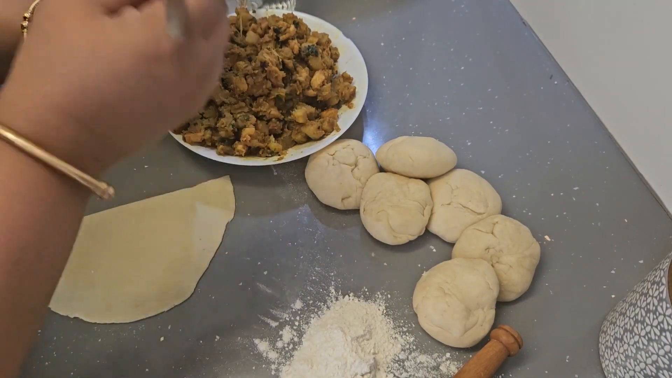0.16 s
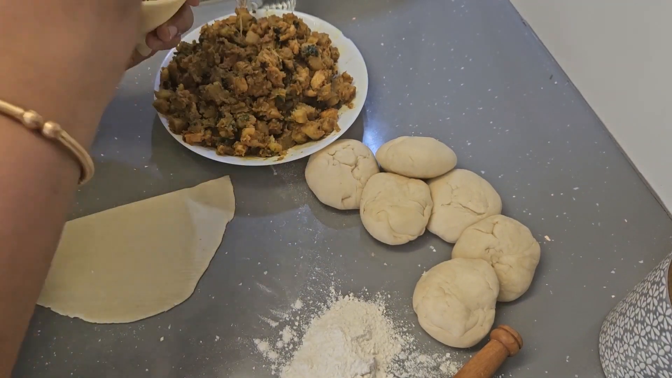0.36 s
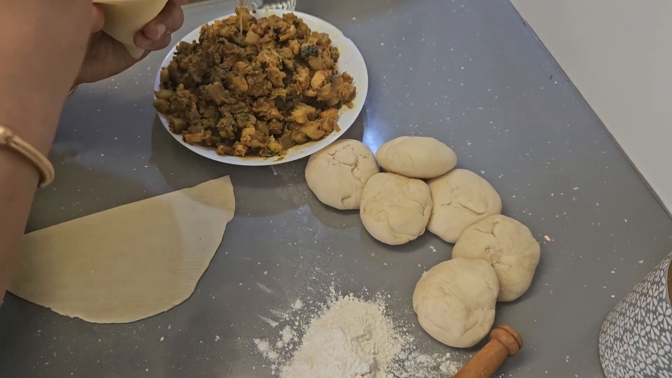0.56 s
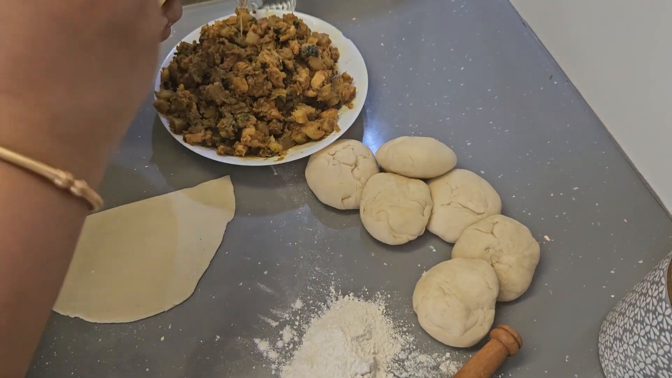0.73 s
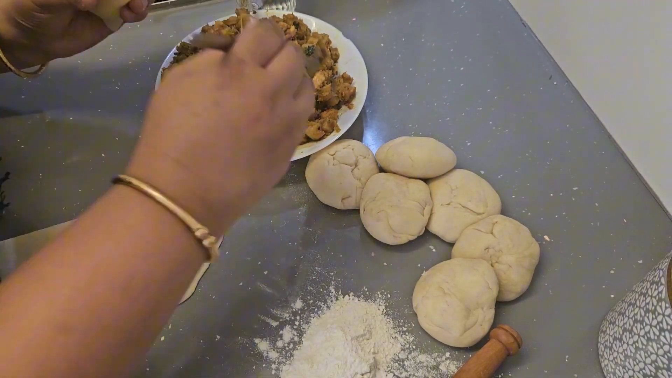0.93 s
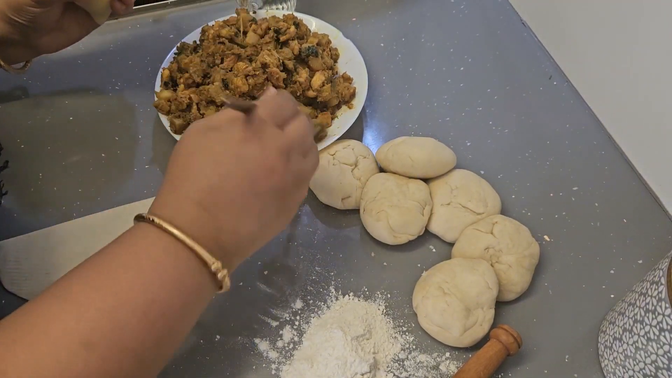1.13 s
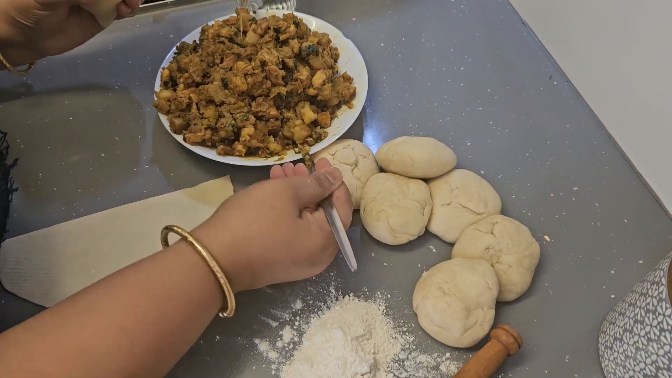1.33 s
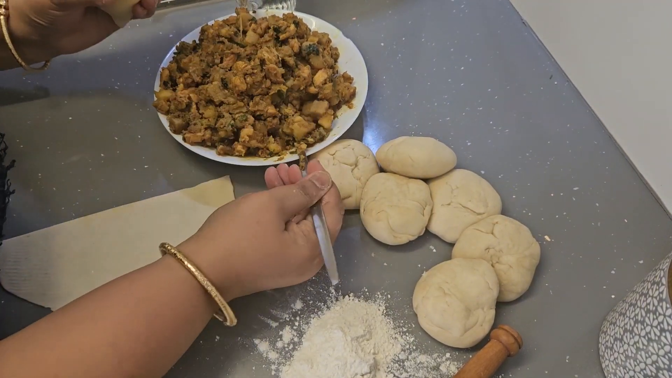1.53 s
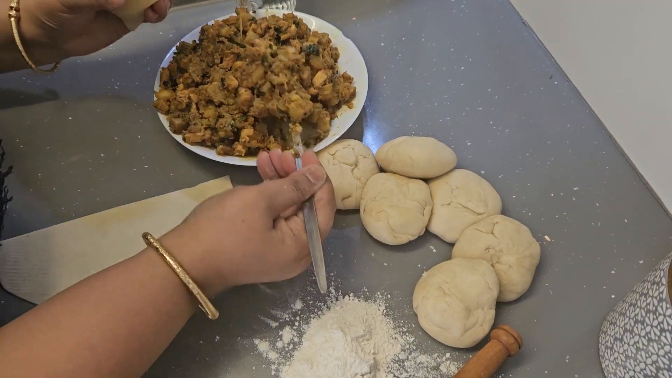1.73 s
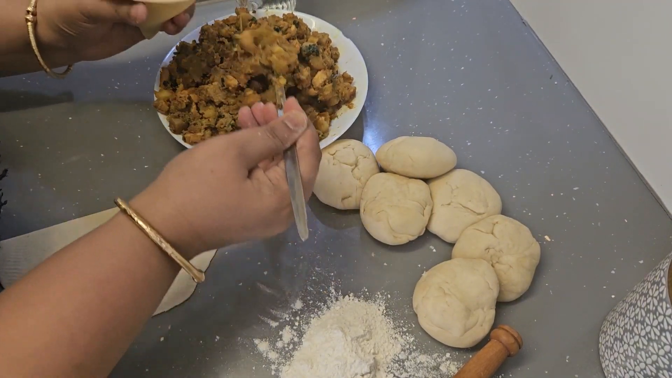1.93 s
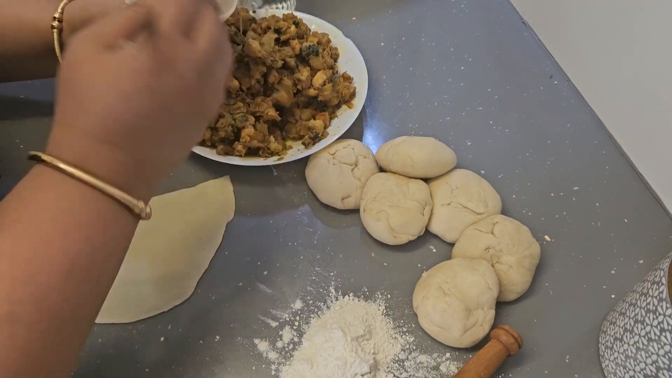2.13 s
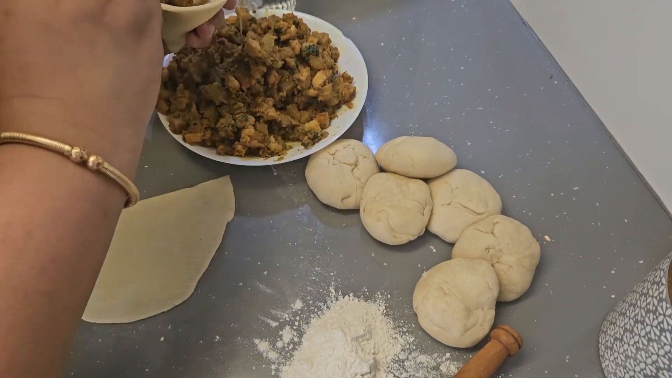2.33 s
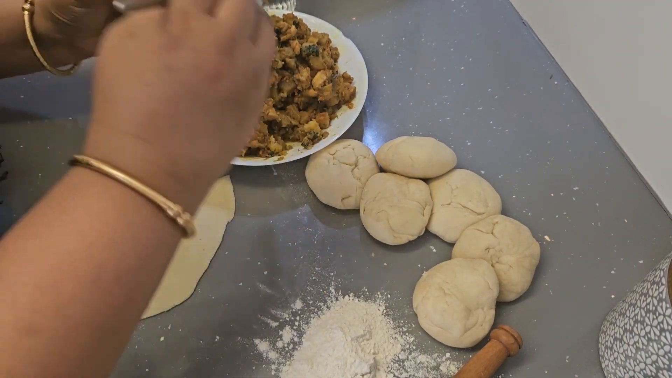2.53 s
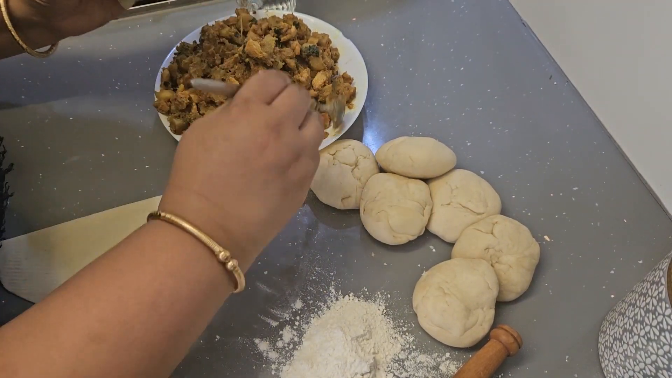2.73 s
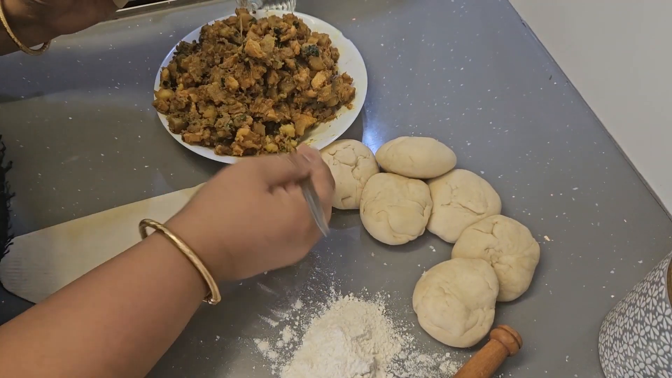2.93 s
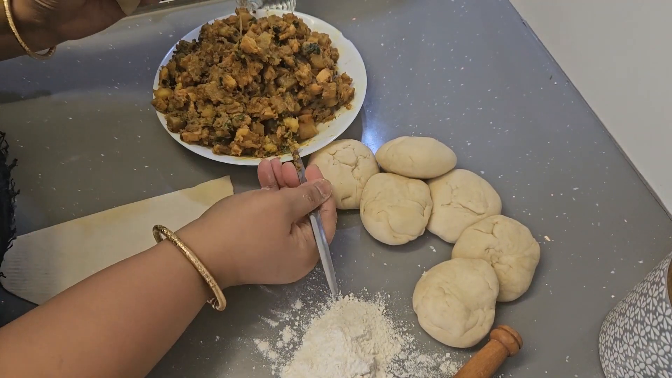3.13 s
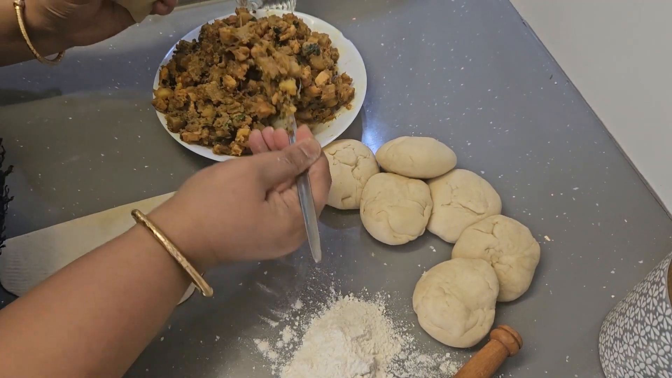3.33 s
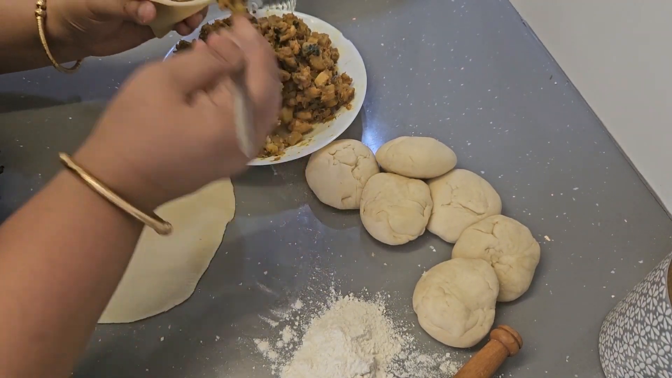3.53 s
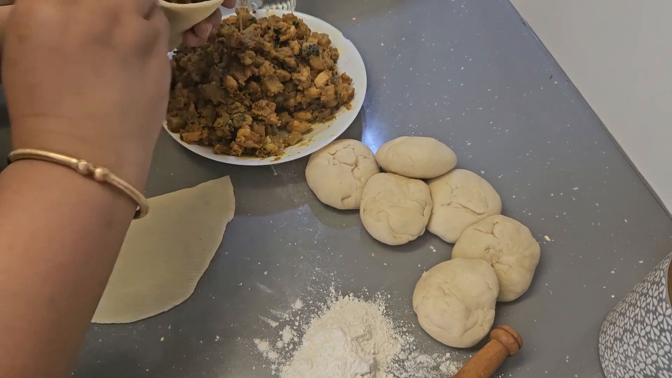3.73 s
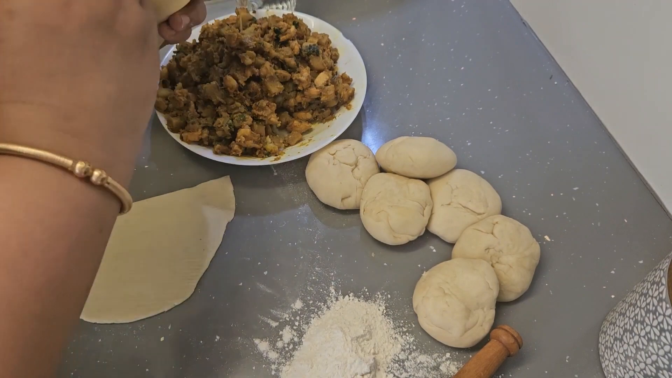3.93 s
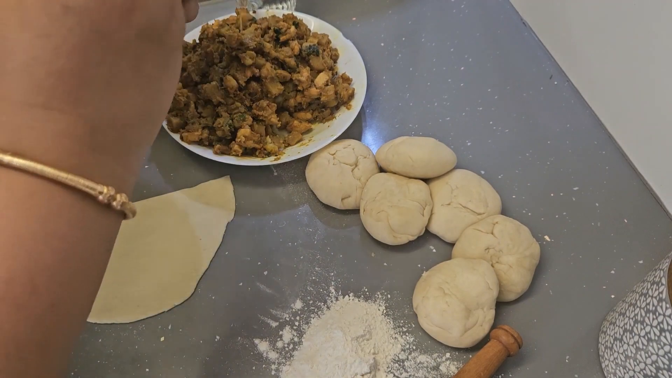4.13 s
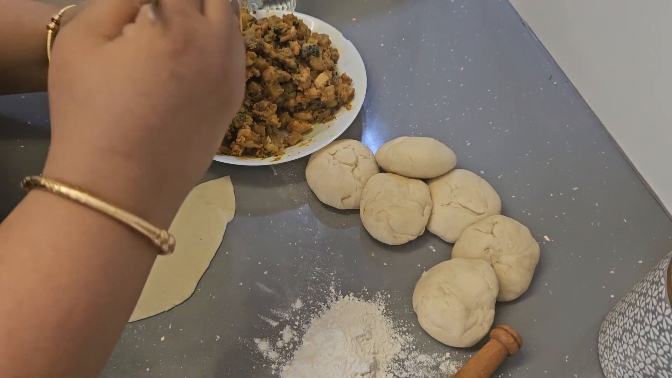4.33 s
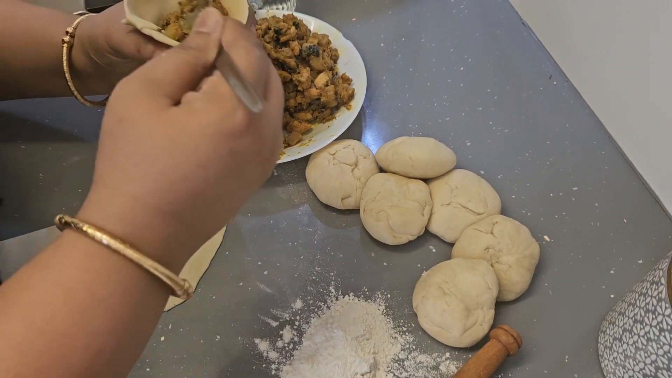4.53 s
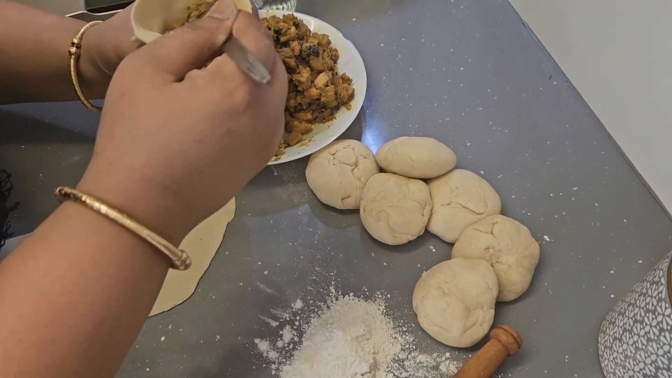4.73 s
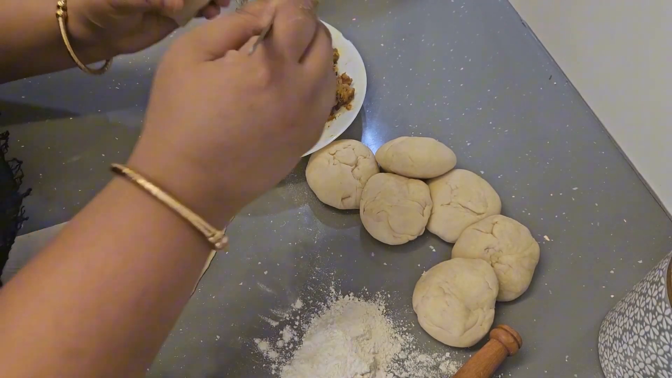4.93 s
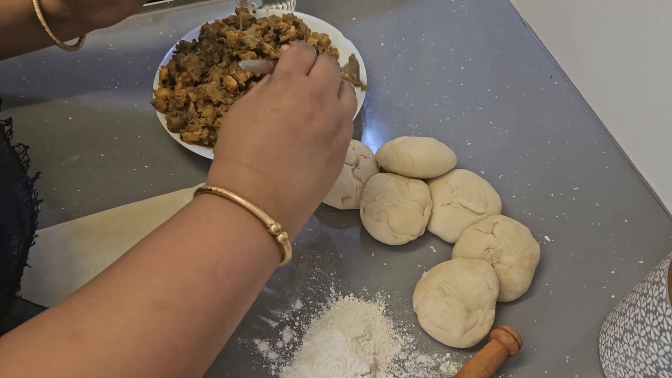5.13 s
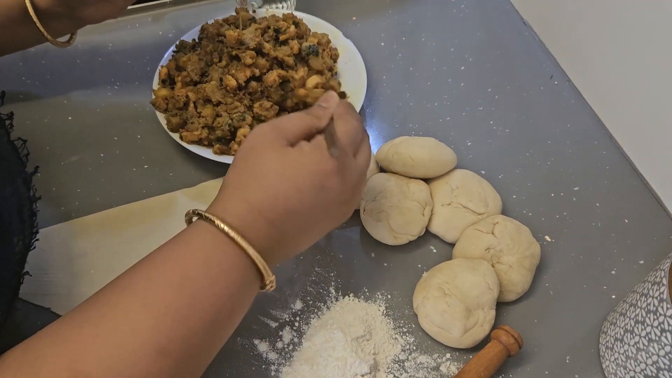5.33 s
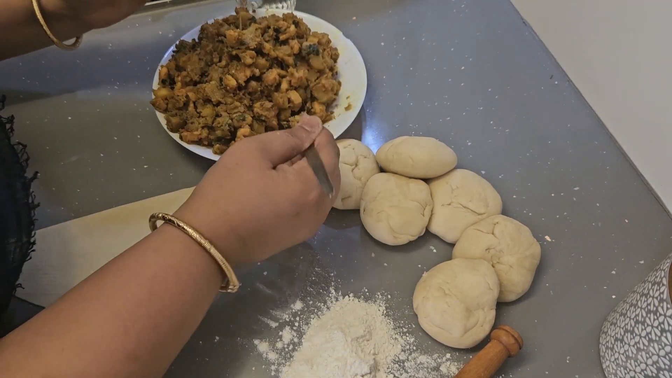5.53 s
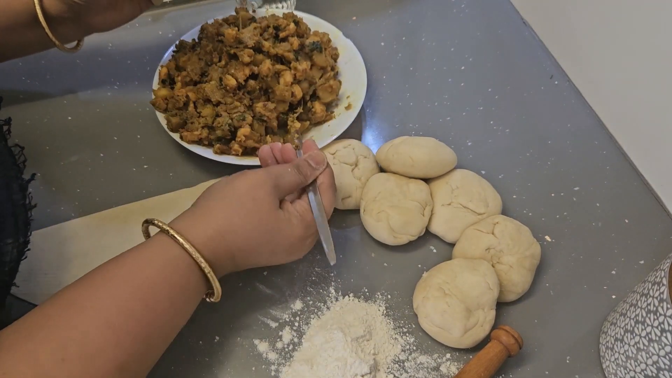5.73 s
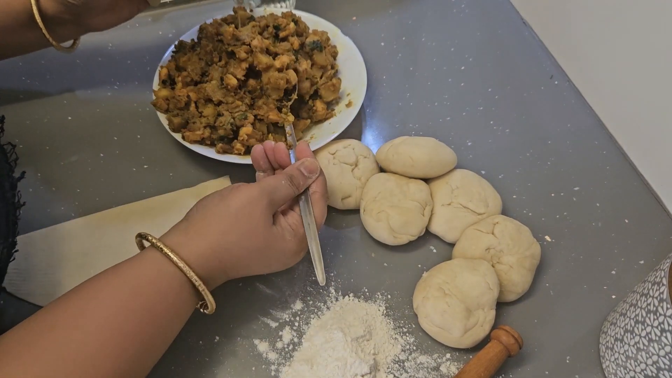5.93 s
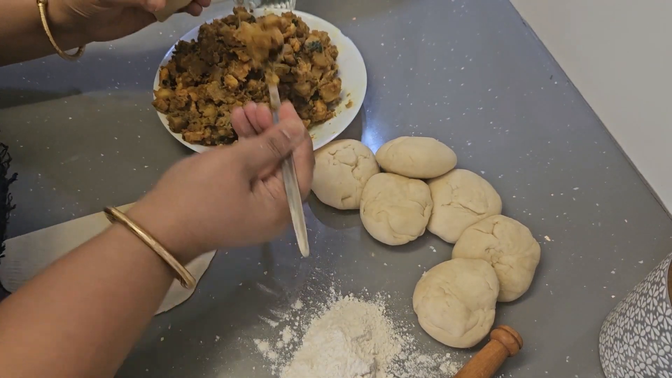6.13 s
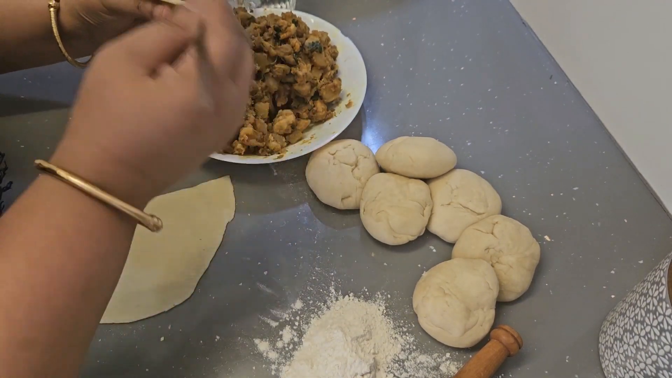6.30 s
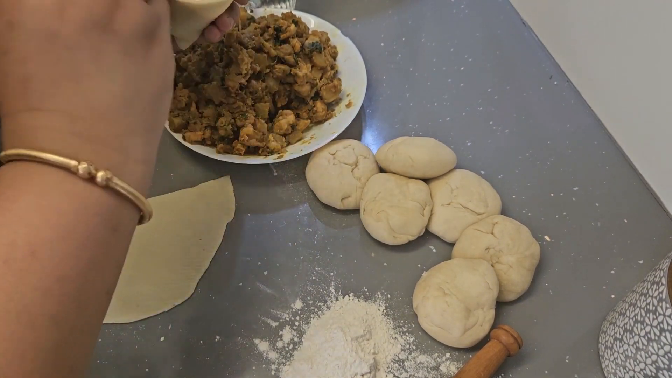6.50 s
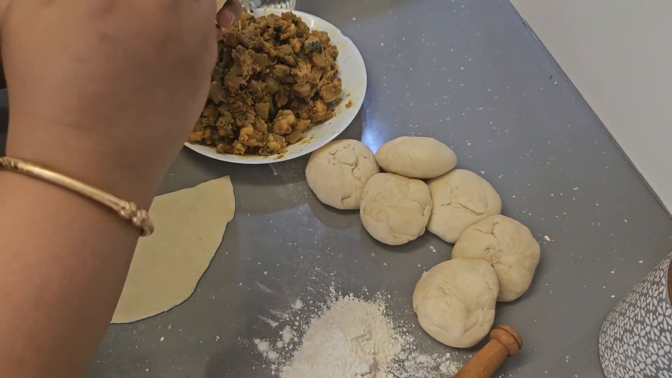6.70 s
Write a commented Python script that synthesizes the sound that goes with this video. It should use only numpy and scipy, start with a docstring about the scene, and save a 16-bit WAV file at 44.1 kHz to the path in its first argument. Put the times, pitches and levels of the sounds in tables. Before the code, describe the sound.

Close-up sound of filling being scooped with a metal spoon. Clinks on a loaded ceramic plate are hard and bright but quickly damped, arriving in small clusters with lighter touches and long gaps. Faint moist ticks come from the food. A deep, unsteady motor and mains hum continues with soft hiss, and a low hollow thump follows the strongest clink. Small, hard-surfaced kitchen with a short reverberant answer.

```python
"""An appliance hums throughout over room air and a faint hiss: wavering sines over shaped noise.
Throughout, soft food ticks, the clearest from about 1 s, as a spoon scoops filling: short noise snaps.
From 1.1 to 5.2 s the steel spoon clinks sharply on a ceramic plate six times, with three lighter touches:
a noisy clack plus short plate and spoon modes, the food damping the plate. At 5.8 s something hollow is
bumped: low modes and a dull puff. Dense noise reflections give the small kitchen's brief answer."""
import sys
import numpy as np
from scipy import signal
from scipy.fft import rfft, irfft
from scipy.io import wavfile
from scipy.ndimage import uniform_filter1d

SR = 44100
rng = np.random.default_rng(int(sys.argv[2]) if len(sys.argv) > 2 else 0)


def int16_out(signal):
    """Quantize to a 16-bit WAV file."""
    q = np.round(np.clip(np.atleast_2d(signal).T, -1, 1) * 32767)
    wavfile.write(sys.argv[1], SR, q.astype(np.int16))


N = 302470


def gain_of(db):
    """Decibels to amplitude."""
    return 10 ** (np.asarray(db) / 20)


def evened(x):
    """Scales to rms 1."""
    return x / np.sqrt(np.mean(x ** 2) + 1e-20)


def read(points, hz):
    """Interpolates a spectrum table on a log-frequency axis."""
    f, value = np.transpose(points)
    return np.interp(np.log(hz + 1), np.log(f + 1), value)


def add(mix, start_s, sound):
    """Adds a stereo sound into the mix at start_s."""
    part = mix[:, round(start_s * SR):][:, :sound.shape[1]]
    part += sound[:, :part.shape[1]]


def coloured(x, points, size=2048):
    """Minimum-phase filter with the dB gain of a spectrum table."""
    log_gain = np.log(gain_of(read(points, abs(np.fft.fftfreq(size, 1 / SR)))))
    taps = np.fft.ifft(np.exp(np.conj(signal.hilbert(log_gain)))).real
    return signal.fftconvolve(x, taps[None], axes=1)[:, :x.shape[1]]


def band_noise(hz, width_hz):
    """Noise in one bell-shaped band, rms 1."""
    f = np.fft.rfftfreq(N, 1 / SR)
    bell = np.exp(-.5 * ((f - hz) / width_hz) ** 2)
    return evened(irfft(rfft(rng.standard_normal(N)) * bell, N))


def air(level_db=0, flicker_db=1):
    """Room air and hiss as shaped noise, alike left and right in the bass, flickering slightly."""
    # Each row: frequency in Hz, density in dB per Hz before the rises and dips.
    density = [(12, -84), (24, -80.5), (60, -71), (140, -82), (230, -86), (300, -83), (430, -78.5),
               (520, -90.5), (1150, -94), (1650, -103.5), (2800, -104.5), (4700, -95.5), (9700, -100),
               (15800, -99.5)]
    # Narrow rises and dips. Each row: centre in Hz, width in Hz, change in dB.
    hiss_peaks = [(645, 22, 5), (780, 20, 4), (990, 60, 3), (1225, 40, 5), (1840, 50, 7), (2220, 50, 5),
                  (2510, 50, 9), (3110, 65, 7), (3500, 110, 4), (4270, 40, 5), (6900, 200, -3),
                  (7380, 180, 4), (8400, 300, 2), (11950, 480, 7), (12050, 110, 3)]
    # Each row: frequency in Hz, left-right correlation (no unit).
    likeness = [(60, 0.94), (130, 0.98), (290, 0.75), (450, 0.92), (700, 0.12), (1400, 0.02),
                (3100, -0.033), (7000, 0.0061)]
    frames = N // 256 + 5
    hz = np.fft.rfftfreq(1024, 1 / SR)
    a, b, c, d, patches = rng.standard_normal((5, frames, len(hz))).transpose(0, 2, 1)
    patches = uniform_filter1d(patches, size=8, axis=0)
    patches = evened(uniform_filter1d(patches, size=6, axis=1))
    same = np.clip(read(likeness, hz), -1, 1)[:, None]
    left = a + 1j * b
    right = same * left + np.sqrt(1 - same ** 2) * (c + 1j * d)
    peaks_db = sum(db * np.exp(-.5 * ((hz - f) / w) ** 2) for f, w, db in hiss_peaks)
    gain = gain_of(read(density, hz) + peaks_db)
    spectra = np.array([left, right]) * gain[:, None] * gain_of(flicker_db * patches)
    noise = signal.istft(spectra, nperseg=1024, noverlap=768)[1][:, :N]
    rms = np.sqrt(np.sum(gain ** 2) * hz[1])
    return gain_of(level_db) * rms * evened(noise)


def wavering(hz, drift_hz):
    """A sine of rms 1 whose pitch wanders slowly by smooth random drift."""
    turns = np.cumsum(hz + drift_hz * band_noise(0, width_hz=2.73)) / SR
    return np.sqrt(2) * np.sin(2 * np.pi * (turns + rng.random()))


def appliance(drift_hz=0.5, throb=0.33):
    """Motor and mains sines waver and throb independently; the drone rises and dips, its octave swells."""
    # Steady tones. Each row: frequency in Hz, rms in dB before throb.
    hum = [(30.6, -56.5), (200.2, -72), (378, -68.5)]
    # Low mains drone. Each row: time in s, level in dB before trim and throb.
    drone = [(0.0, -55), (0.23, -82), (0.63, -52.5), (4.01, -46), (4.35, -55.5), (5.18, -43.5), (6.72, -52),
             (6.86, -72)]
    # Swells added to the idling octave. Each row: start in s, length in s, added rms in dB before throb.
    octave_swells = [(3.632, .13, -52), (3.89, 0.23, -47.5), (4.2, 0.37, -55), (5.963, 0.25, -49.5),
                     (6.486, 0.075, -47)]
    drone_hz, drone_trim_db = 49, -1.5
    octave_hz, octave_idle_db, swell_edge_s = 100, -61.5, .05
    t = np.arange(N) / SR
    swells = 0
    for start_s, length_s, db in octave_swells:
        edge_distance_s = np.minimum(t - start_s, start_s + length_s - t)
        swells = swells + gain_of(db) * np.clip(edge_distance_s / swell_edge_s, 0, 1)
    tones = [gain_of(db) * wavering(hz, drift_hz) for hz, db in hum]
    drone_db = np.interp(t, *np.transpose(drone)) + drone_trim_db
    tones.append(gain_of(drone_db) * wavering(drone_hz, drift_hz=1.386))
    tones.append((gain_of(octave_idle_db) + swells) * wavering(octave_hz, drift_hz=3.93))
    return sum(tone * (1 + throb * band_noise(0, width_hz=3.8)) for tone in tones)


def bump(rise_s=0.015, puff_db=-10, puff_s=0.053):
    """A soft blow on something hollow wakes low modes and a dull puff, alike left and right."""
    # One row: start in s, level in dB.
    blow = (5.806, -32)
    # Each row: mode frequency in Hz, relative level in dB, t60 in s.
    hollow = [(258, 1.5, 0.27), (274, -1.5, 0.25), (344, -22, 0.064), (410, -6, 0.11), (506, -4, 0.12),
              (610, -12, 0.17), (780, -15, 0.14)]
    out, t = np.zeros((2, N)), np.arange(SR // 2) / SR
    start_s, level_db = blow
    thud = sum(gain_of(db - 60 * t / t60) * np.sin(2 * np.pi * hz * t) for hz, db, t60 in hollow)
    thud += gain_of(puff_db) * np.exp(-t / puff_s) * band_noise(384, width_hz=240)[:len(t)]
    add(out, start_s, gain_of(level_db) * np.array([thud, thud]) * (1 - np.exp(-t / rise_s)))
    return out


def faint_ticks():
    """Tiny ticks at random moments, as rows: start in s, level in dB before trim, centre in Hz."""
    per_s, mean_db, spread_db, centre_hz = 1.6, -45, 2, 12000
    draws = rng.random((round(per_s * N / SR), 2))
    return [(when * N / SR, mean_db + spread_db * (2 * size - 1), centre_hz) for when, size in draws]


def food(trim_db=-5.0, decay_s=0.0053, spread=0.13):
    """Small wet snaps as pieces of filling part: decaying noise in a log-frequency bell."""
    # The clearest ticks. Each row: start in s, level in dB before trim, centre in Hz.
    clear_ticks = [(0.964, -43, 11600), (1.6716, -42.5, 8400), (2.0338, -43, 12000), (4.22, -44, 9090),
                   (5.0903, -44.5, 6900), (5.6585, -41.5, 10300), (5.9429, -41, 10500),
                   (6.4004, -41.5, 7500)]
    out, t = np.zeros((2, N)), np.arange(2 ** 11) / SR
    f = np.fft.rfftfreq(len(t), 1 / SR)
    for start_s, db, hz in clear_ticks + faint_ticks():
        band = np.exp(-.5 * (np.log((f + 1) / hz) / spread) ** 2)
        snap = evened(irfft(rfft(rng.standard_normal((2, len(t)))) * band))
        add(out, start_s, gain_of(db + trim_db) * snap * np.exp(-t / decay_s))
    return out


def ring(modes, t, rise_s, blur_hz=45, count=5):
    """Dying modes, each a close cluster blurred by the shifting contact, phases differing left to right."""
    tones, centre_hz = np.zeros((2, len(t))), np.mean(modes, axis=0)[0]
    for hz, db, t60 in modes:
        offsets = np.linspace(-1, 1, count) + rng.uniform(-.2, .2, count)
        split_hz = hz + blur_hz * np.sqrt(hz / centre_hz) * offsets
        shape = gain_of(db - 60 * t / t60) * (1 - np.exp(-t / rise_s))
        phase_turns = rng.random((2, count, 1))
        cluster = shape * np.sin(2 * np.pi * (split_hz[:, None] * t + phase_turns)).sum(1)
        # however the cluster beats, it holds the energy of one mode
        one_mode = np.linalg.norm(shape) / np.sqrt(2)
        tones += cluster * one_mode / np.linalg.norm(cluster, axis=1, keepdims=True)
    return tones


def clack(t, rise_s, scatter_db, scatter_s):
    """Steel chatters on glaze for a few ms; the counter top scatters the sound a little longer."""
    chatter = t / rise_s * np.exp(1 - t / rise_s)
    scatter = gain_of(scatter_db) * np.exp(-t / scatter_s) * (1 - np.exp(-t / rise_s))
    shape = chatter + scatter
    burst = rng.standard_normal((2, len(t))) * shape
    # a hard contact holds all frequencies about equally: keep phase, flatten magnitude
    burst = irfft(np.exp(1j * np.angle(rfft(burst))), len(t)) * np.sqrt(shape / shape.max())
    return burst * np.linalg.norm(shape) / np.linalg.norm(burst, axis=1, keepdims=True)


def clinks(favour_octaves=0.12):
    """Clack plus plate and spoon ring; harder contact is brighter, the strike point lifts two resonances."""
    # Each row: start in s, blow in dB, left-right difference in dB, brightness in dB per octave,
    # low knock in dB, plate ring in dB, spoon ring in dB, two favoured resonances in Hz, their lift in dB.
    strikes = [(1.1292, -23.5, 0.32, 1.5, 1.5, -3, -10, 1460, 2240, 6.6),
               (1.1365, -38, 1.2, -1.5, -10, -1, -12, 2360, 4460, 16),
               (1.3696, -29.5, 0.4, 2.5, 9, -12, -16, 4500, 3600, 11.2),
               (1.5065, -47, 0, -7, -16, -2, -12, 2240, 1400, 4.9),
               (2.787, -24, 1, 0.5, 2.5, 1, -6.5, 3250, 694, 4.4),
               (2.8990, -22, 0.12, 1.5, -3, -9, -6.5, 7350, 6640, 3.8),
               (2.9950, -46, 0, -1.5, 2, -12, -12, 1400, 1500, 5.4),
               (3.0227, -29.5, 0.42, -2.5, 3.5, 2, -20, 2880, 5100, 12.3),
               (5.2094, -14, 1.1, 1, -5, -0.5, -16, 1470, 3700, 5.2)]
    # Dry contact colour. Each row: frequency in Hz, gain in dB.
    clack_colour = [(150, -26.5), (450, -12.5), (620, 2), (1000, -8), (1500, -1), (1900, -6.5), (3200, -2),
                    (4000, -8), (4950, -13.5), (5650, 2), (7000, -8.5), (8300, 0), (9500, -9.5),
                    (12600, -5), (13800, -11), (15500, -11)]
    # Ceramic modes. Each row: cluster centre in Hz, relative level in dB, t60 in s.
    plate = [(1590, -20, .12), (2225, -20, .09), (2310, -21, .21), (2900, -23, .11), (3390, -17, .09),
             (4370, -17, .16), (5520, -15.5, .09), (8260, -19, .18), (9630, -25, .1), (13050, -22, .1)]
    # Steel modes. Each row: cluster centre in Hz, relative level in dB, t60 in s.
    spoon = [(2900, -9.5, 0.19), (3170, -29, .18), (6000, -27, .1), (7830, -17, 0.091), (7300, -5.5, 0.13),
             (8840, -4, 0.074), (10800, -6.5, 0.087), (12450, -7, .1)]
    # brightness tilts about pivot_hz; the plate's knock on the counter lies below knock_hz
    pivot_hz, knock_hz = 3020, 970
    out, t = np.zeros((2, N)), np.arange(2 ** 14) / SR
    hz = np.geomspace(100, 20000, 400)
    for start_s, db, pan_db, bright_db, knock_db, plate_db, spoon_db, hz_a, hz_b, lift_db in strikes:
        contact = clack(t, rise_s=0.0022, scatter_db=-8.5, scatter_s=0.014)
        blow = gain_of(2) * coloured(contact, clack_colour)
        blow += gain_of(plate_db) * ring(plate, t, rise_s=0.00096, blur_hz=52.5)
        blow += gain_of(spoon_db) * ring(spoon, t, rise_s=0.0014, blur_hz=87)
        tone_db = bright_db * np.log2(np.maximum(hz, knock_hz / 2) / pivot_hz)
        tone_db += knock_db / (1 + (hz / knock_hz) ** 6)
        for favoured_hz in hz_a, hz_b:
            tone_db += lift_db * np.exp(-.5 * (np.log2(hz / favoured_hz) / favour_octaves) ** 2)
        sides = gain_of(db + np.array([[.5], [-.5]]) * pan_db)
        add(out, start_s, sides * coloured(blow, np.column_stack([hz, tone_db])))
    return out


def kitchen(x, build_s=0.0069):
    """Dense reflections: noise that builds up over some ms, then decays at a rate set per frequency."""
    # Each row: frequency in Hz, t60 in s.
    decay = [(200, 0.7), (700, 0.18), (2500, 0.21), (7000, 0.25), (15000, 0.28)]
    hz, t, z = signal.stft(rng.standard_normal((2, SR // 2)), SR, nperseg=256)
    tail = signal.istft(z * gain_of(-60 * t / read(decay, hz)[:, None]), SR, nperseg=256)[1]
    tail *= 1 - np.exp(-(np.arange(tail.shape[1]) / SR / build_s) ** 2)
    tail /= np.linalg.norm(tail, axis=1, keepdims=True)
    wet = signal.fftconvolve(x, tail, axes=1)[:, :N]
    # Hz, dB
    return coloured(wet, [(300, 6.5), (700, 2.0), (2500, -0.5), (6000, -1.5), (13000, -6)])


def scene():
    """Spoon, plate, food and bump, direct and reflected by the room, over hum and air."""
    near, thud = clinks() + food(), bump()
    reflected = kitchen(gain_of(-7) * near + gain_of(-20) * thud)
    return near + thud + reflected + air() + appliance()


def record(dry):
    """Band limit: a steep linear-phase low-pass."""
    edge_hz = 15850
    taps = signal.firwin(511, edge_hz, window=("kaiser", 9), fs=SR)
    return signal.oaconvolve(dry, taps[None], "same", axes=1)


dry = scene()
out = record(dry)
int16_out(out)
```